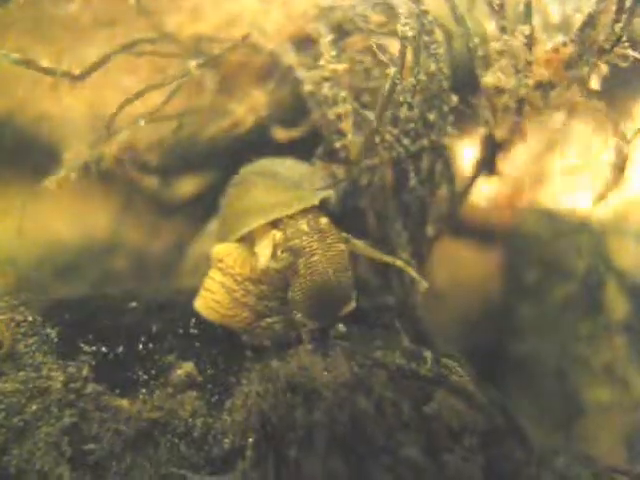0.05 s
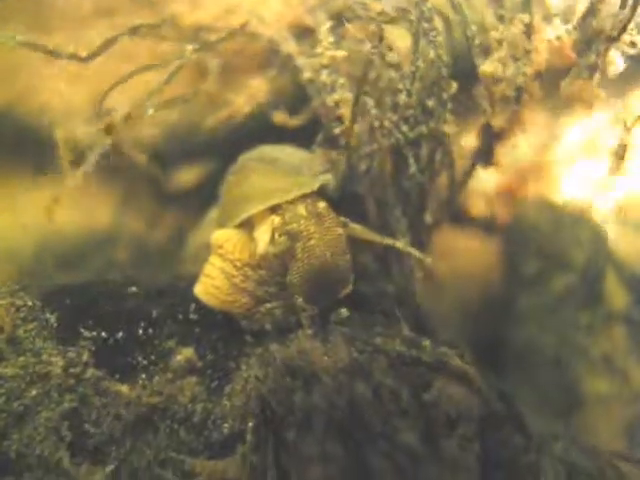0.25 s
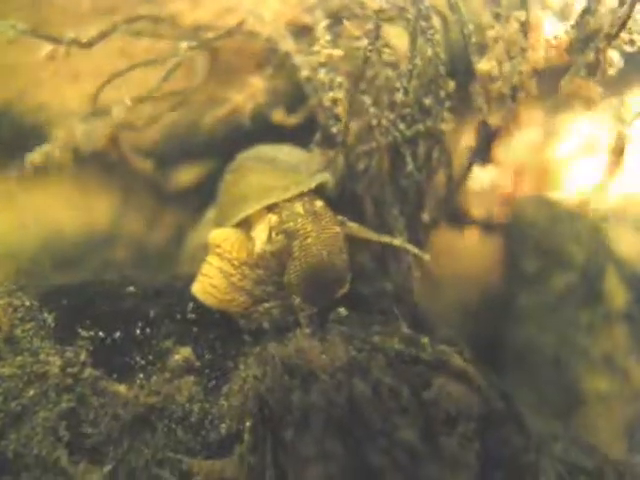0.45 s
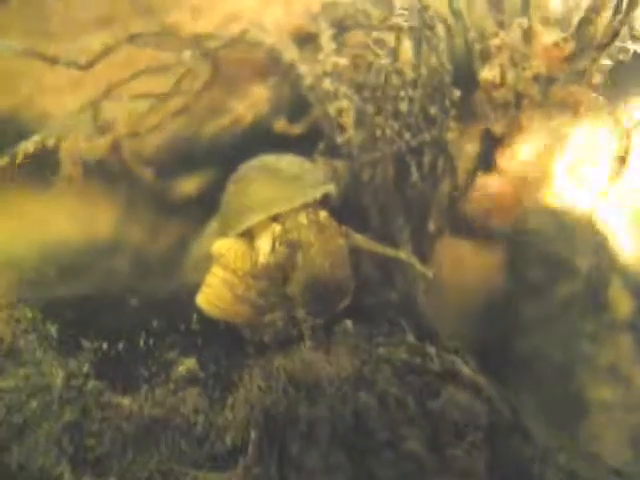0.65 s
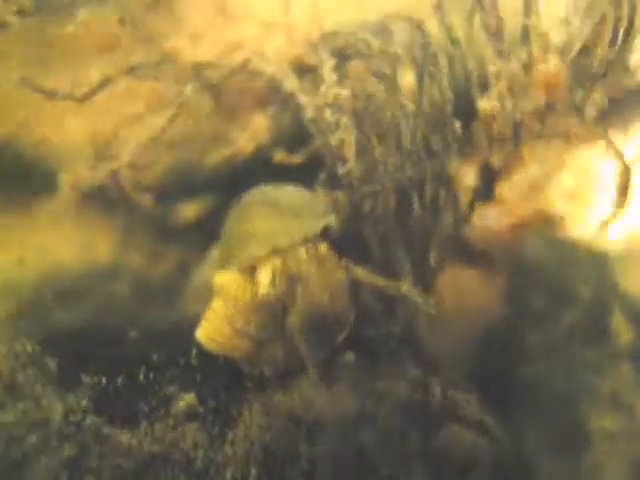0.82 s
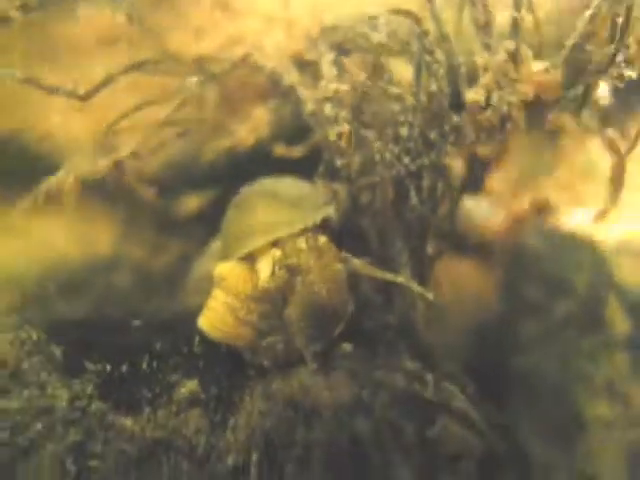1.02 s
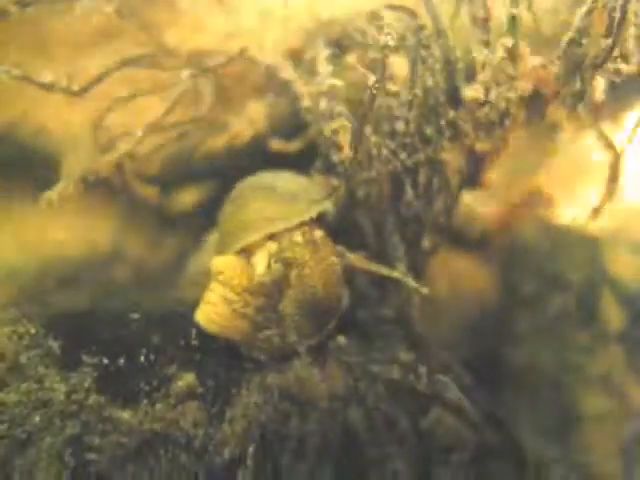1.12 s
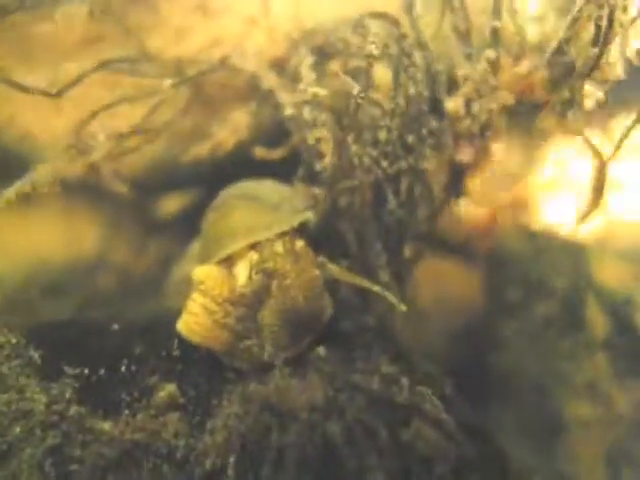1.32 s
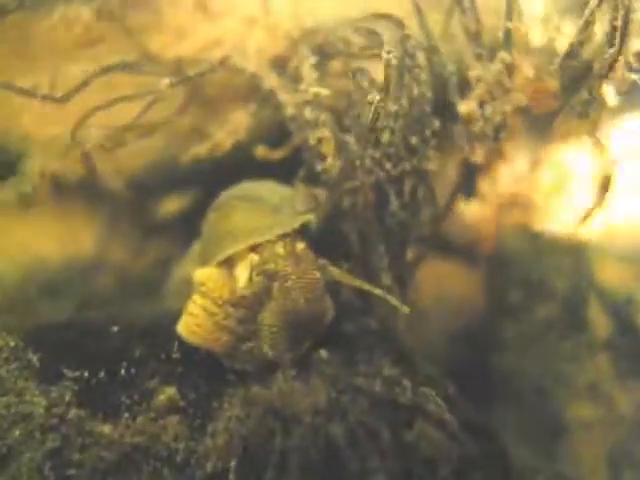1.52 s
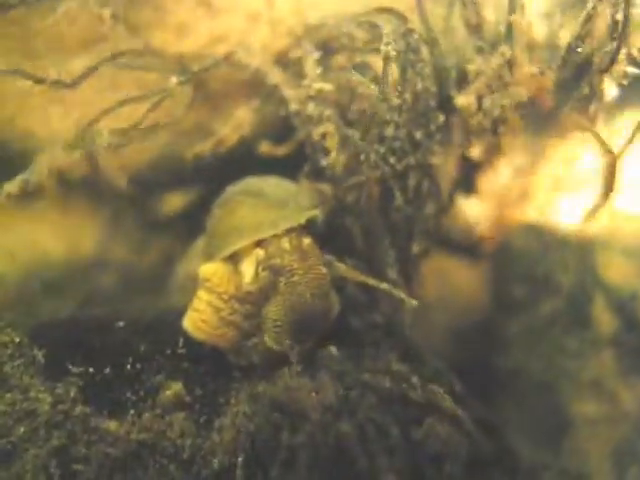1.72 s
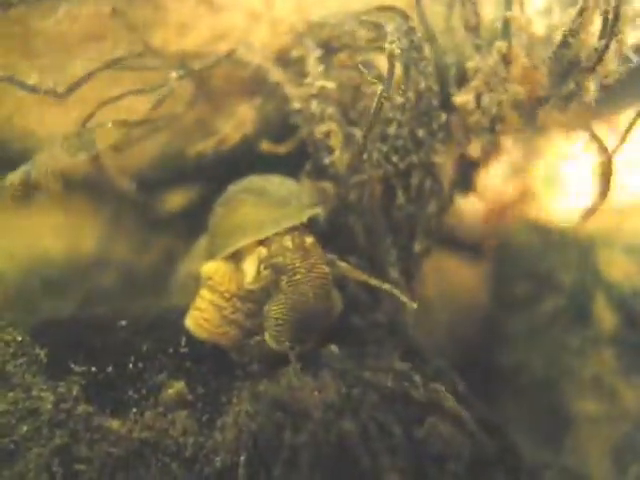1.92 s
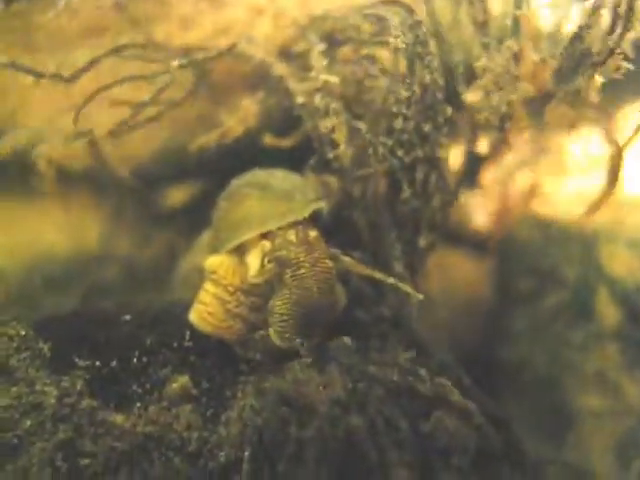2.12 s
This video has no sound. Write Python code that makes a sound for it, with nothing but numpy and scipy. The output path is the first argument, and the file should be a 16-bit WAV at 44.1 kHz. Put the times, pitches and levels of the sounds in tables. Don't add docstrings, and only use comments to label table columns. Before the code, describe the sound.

Hollow plastic housing knocks and clicks sharply in irregular bursts over a faint underwater stream rush

```python
import sys
import numpy as np
from scipy import signal
from scipy.fft import rfft, irfft, next_fast_len
from scipy.io import wavfile
from scipy.ndimage import uniform_filter1d, map_coordinates

SR = 44100
rng = np.random.default_rng(int(sys.argv[2]) if len(sys.argv) > 2 else 0)


def ratio_of_db(decibels):
    return 10 ** (np.asarray(decibels, float) / 20)


def dump_mix(stems):
    frames = np.atleast_2d(stems).T
    limited = np.clip(frames, -1, 1)
    pcm = np.round(limited * 32767).astype(np.int16)
    wavfile.write(sys.argv[1], SR, pcm)


N = 94815
CRACK_HZ, CRACK_WIDTH_HZ = 2800, 1450


def unit(x):
    return x / np.sqrt(np.mean(x ** 2) + 1e-20)


def wobble(rate, size):
    knots = rng.standard_normal(int(size * rate / SR) + 4)
    return map_coordinates(knots, [np.arange(size) * rate / SR])


def filtered(x, response):
    m = next_fast_len(len(x) + 8192)
    return irfft(rfft(x, m) * response(np.fft.rfftfreq(m, 1 / SR)), m)[:len(x)]


def resonant(x, hz, width):
    return unit(filtered(x, lambda f: 1j * f * width / (hz * hz - f * f + 1j * f * width)))


def add(out, s, x):
    out[round(s * SR):][:len(x)] += x


def grit():
    grains_per_s, spread_db = 400, 2
    draw = rng.random((2, N))
    struck = draw[0] < grains_per_s / SR
    size = ratio_of_db(-spread_db * np.log(draw[1] + 1e-9))
    return struck * size * rng.choice([-1, 1], N)


def water():
    # f/Hz, level/dB
    rush_spectrum = [(18, -87), (30, -9.5), (102, -4.5), (312, -3.5), (575, -3), (1330, -6.5), (1690, -6.5),
                     (3050, -11), (3900, -11), (5070, -52), (8580, -120)]
    # f/Hz, bandwidth/Hz, level/dB
    shell_modes = [
        (571.2, 37.7, 8.5),
        (870.4, 82, 3.5),
        (1767.4, 69, 6),
        (3000, 370, 3),
    ]
    # t/s, added level/dB
    stirring = [(0, 1), (.2, 0.5), (.48, 0), (.6, 2.5), (.72, 0.5), (.77, 2), (.9, 2), (1.1, 3.5), (1.3, 0),
                (1.6, 1), (2.15, 0)]
    water_db, patchy_db, grit_db, gurgle_db = -50, 1.3, -6.5, .6

    z = signal.stft(rng.standard_normal(N), nperseg=512)[2]
    patches = uniform_filter1d(rng.standard_normal(z.shape), 4, 0)
    patches = unit(uniform_filter1d(patches, 6, 1))
    rush = signal.istft(z * ratio_of_db(patchy_db * patches), nperseg=512)[1][:N]
    rush = unit(rush) + ratio_of_db(grit_db) * unit(grit())

    hz, db = np.transpose(rush_spectrum)

    def colour(f):
        peaks = sum(gain_db / (1 + ((f - centre) / width * 2) ** 2) for centre, width, gain_db in shell_modes)
        return ratio_of_db(np.interp(np.log(f + 1), np.log(hz + 1), db) + peaks)

    rush = unit(filtered(rush, colour))
    stir_db = np.interp(np.arange(N) / SR, *np.transpose(stirring))
    return ratio_of_db(water_db + stir_db + gurgle_db * wobble(30.15, N)) * rush


def lurches():
    # t/s, peak level/dB, push length/s
    lurch_table = [
        (.390, -30, 0.0021),
        (.426, -46.5, 0.0037),
        (.515, -36, 0.0035),
        (.637, -22, 0.00465),
        (.841, -32, 0.00216),
        (.997, -36, 0.0022),
        (1.136, -30.5, 0.0031),
    ]
    out, t = np.zeros(N + SR), np.arange(SR // 20) / SR
    for s, db, length in lurch_table:
        add(out, s, ratio_of_db(db) * np.e * t / length * np.exp(-t / length))
    return out[:N]


def creaks():
    # t/s, length/s, final level/dB, f/Hz
    creak_table = [(.376, .008, -49, 2300), (.924, .016, -41, 2060), (1.034, .012, -42, 2300),
                   (1.099, .034, -50, 2350), (.692, .026, -48, 2950), (.786, .026, -48, 2900),
                   (1.150, .030, -54, 2900), (1.558, .03, -55, 2200), (1.615, .02, -55, 3000),
                   (.335, .02, -55, 1750), (1.59, .04, -59, 2600)]
    swell_db, width_hz, slip_db, release_t60 = -1.5, 233, 4.5, 0.0185
    out, t = np.zeros(N + SR), np.arange(SR // 8) / SR
    for s, length, db, hz in creak_table:
        slips = rng.standard_normal(len(t)) * ratio_of_db(slip_db * wobble(370, len(t)))
        tone = resonant(slips, hz, width_hz)
        swell = swell_db * (np.minimum(t / length, 1) - 1)
        release = -60 * np.maximum(t - length, 0) / release_t60
        onset = np.minimum(t / 0.0035, 1)
        add(out, s, ratio_of_db(db + swell + release) * onset * tone)
    return out[:N]


def stiff_impacts(rows, rise, crack_db, rough, spike_db):
    spike_s = .00008
    out, t = np.zeros(N + SR), np.arange(SR // 12) / SR
    for s, db, hz, t60 in rows:
        shape = (1 - np.exp(-(t / rise) ** 2)) * ratio_of_db(-60 * t / t60)
        shape = shape / shape.max()
        ring = np.sin(2 * np.pi * (hz * t + rough * wobble(482, len(t))))
        crack = ratio_of_db(crack_db) * resonant(wobble(9053, len(t)), CRACK_HZ, CRACK_WIDTH_HZ)
        u = (t - rise) / spike_s
        spike = ratio_of_db(spike_db) * (u * u - 1) * np.exp(-u * u / 2)
        add(out, s - rise, ratio_of_db(db) * (shape * (ring + crack) + spike))
    return out[:N]


def seam_snaps():
    # t/s of the peak, peak level/dB, f/Hz, t60/s
    snap_table = [(.2060, -43, 2054, 0.024), (.2105, -40, 2197, 0.0214), (.2385, -47.5, 2023, 0.033),
                  (.3867, -17, 2100, 0.004), (.3899, -12, 2800, .007), (.3925, -19, 2373, 0.0086),
                  (.4246, -32.5, 2620, 0.0095), (.4262, -23.5, 2222, 0.0255), (.4283, -34.5, 2300, 0.0137),
                  (.4195, -41, 2220, 0.0226), (.5016, -33, 2260, 0.027), (.5072, -32, 2110, 0.025),
                  (.5125, -32.5, 2070, 0.0156), (.6333, -25, 2800, 0.0098), (.6365, -31.5, 2630, 0.0115),
                  (.6382, -19, 2290, 0.0088), (1.5900, -38.5, 2280, 0.0082), (.6404, -18.5, 3000, 0.0035),
                  (.6378, -22, 3800, 0.0066), (.6422, -30, 2714, 0.0063), (.6462, -29, 2090, 0.0196),
                  (.6438, -30, 2700, 0.0076), (.7166, -44.5, 2827, 0.049), (.7328, -37, 3000, 0.012),
                  (.8404, -23.5, 2663, 0.0097), (.8345, -41.5, 3000, 0.0138), (.8464, -34, 2658, 0.019),
                  (.8845, -35, 2184, 0.018), (.9330, -45, 2550, 0.014), (.9387, -25.5, 2725, 0.0131),
                  (.9405, -34, 2146, 0.0091), (.9445, -45, 2770, 0.0095), (.9759, -29, 3570, 0.0093),
                  (.9937, -26.5, 3244, 0.0083), (.9965, -32.5, 3200, 0.0074), (1.0220, -27, 2043, 0.0227),
                  (1.0278, -32, 2820, 0.0114), (1.0778, -38, 2210, 0.0214), (1.0878, -36.5, 2880, 0.0113),
                  (1.1327, -33, 2405, 0.0109), (1.1345, -36, 2294, 0.011), (1.1364, -23, 2420, 0.0079),
                  (1.1392, -34.5, 2160, 0.014), (1.1448, -37.5, 2350, 0.0154), (1.1764, -37.5, 2850, 0.027),
                  (1.2730, -41, 1856, 0.0145), (1.3075, -44.5, 1683, 0.02), (1.5225, -47, 3000, 0.0093),
                  (1.5275, -48, 3000, .01), (1.604, -39.5, 2900, 0.012), (1.609, -55.5, 2280, 0.0094),
                  (.397, -36, 1997, 0.042), (.4035, -39.5, 2210, 0.0295), (1.6325, -52, 2000, 0.0072),
                  (1.672, -42.5, 3000, 0.0076)]
    return stiff_impacts(snap_table, rise=.0004, crack_db=-5, rough=.1, spike_db=-5.5)


def button_ticks():
    # t/s of the peak, peak level/dB, f/Hz, t60/s
    tick_table = [(.3892, 1, 1971, 0.00473), (.6397, -11, 3000, 0.00544), (.6399, -17.5, 2165, 0.00855),
                  (1.0452, -27, 1950, 0.013), (1.0425, -29, 2015, .015), (.7338, -42.5, 2142, 0.055),
                  (.8398, -22.5, 1948, 0.0076), (.9180, -43, 2043, 0.026), (.9344, -33.5, 1990, 0.0296),
                  (.9780, -36.5, 2016, 0.023), (.9950, -23.5, 2014, 0.0182), (1.0278, -32, 2052, 0.0414),
                  (1.0492, -23, 2030, 0.02), (1.0527, -17.5, 2003, 0.0263), (1.0581, -21, 2030, 0.028),
                  (1.0685, -18, 1936, 0.0078), (1.0742, -29.5, 2077, 0.0126)]
    return stiff_impacts(tick_table, rise=0.0012712, crack_db=-21, rough=0.08, spike_db=-7)


def lid_taps():
    # t/s of the peak, peak level/dB, f/Hz, t60/s
    tap_table = [(.2066, -29.5, 1344, 0.0171), (.3902, -12.5, 1126, 0.0079), (.3908, -14.5, 1515, 0.01),
                 (.3948, -18.5, 1190, 0.0091), (.3995, -30.5, 1249, 0.032), (.4262, -21.5, 1305, 0.0205),
                 (.5021, -21, 1009, 0.0104), (.5071, -24, 1125, 0.0076), (.6348, -22.5, 972, 0.0057),
                 (.6395, -37, 981, 0.0585), (.8424, -24, 1068, 0.0096), (1.0680, -29, 1181, 0.031),
                 (1.0736, -31, 1215, 0.036), (1.1331, -22.5, 965, 0.0068), (1.1369, -24.5, 902, 0.0087),
                 (1.1405, -32.5, 1107, 0.0225)]
    return stiff_impacts(tap_table, rise=0.000687, crack_db=-16.5, rough=.08, spike_db=-34)


def catch():
    # delay t/s, level/dB
    chatter_table = [
        (0, 2),
        (.0033, -2),
        (.0062, -4),
        (0.012, -12),
    ]
    # f/Hz, level/dB, t60/s
    catch_modes = [
        (1358.3, -6, 0.1154),
        (1796, -18.5, 0.099),
        (2278, 0, 0.07),
        (2465, -8, 0.0904),
        (2950, -2, 0.02),
        (3132, -21, 0.134),
        (3426, -33, 0.043),
    ]
    catch_s, catch_db, flutter_db, rough_cycles = .5158, -20.5, 1.5, .07
    out, t = np.zeros(N + SR), np.arange(SR // 5) / SR
    for delay, hit_db in chatter_table:
        ring = np.zeros(len(t))
        for hz, db, t60 in catch_modes:
            unsteady = (hz / 2000) ** 2
            shape = ratio_of_db(db + flutter_db * unsteady * wobble(247, len(t)) - 60 * t / t60)
            cycles = hz * t + rough_cycles * unsteady * wobble(142.6, len(t))
            ring += shape * np.sin(2 * np.pi * cycles)
        crack = resonant(wobble(8652, len(t)), CRACK_HZ, CRACK_WIDTH_HZ)
        crack = 1.453 * ratio_of_db(-60 * t / 0.0244) * crack
        add(out, catch_s + delay, ratio_of_db(catch_db + hit_db) * (ring + crack))
    return out[:N]


def knocks():
    # t/s, peak level/dB, f/Hz, finger contact/s
    knock_table = [(0.2059, -16.5, 406, 0.00837), (0.21, -13.5, 408.3, 0.00352),
                   (0.223, -25.5, 376, 0.00414), (0.2346, -40.5, 392.5, 0.009), (0.2436, -25, 373, 0.00516),
                   (.2395, -40.5, 636, 0.00186), (0.387, -28.5, 364.3, 0.00365),
                   (0.4176, -37.5, 397, 0.00165), (0.4201, -22.5, 398, 0.0007),
                   (0.4216, -26.5, 390.6, 0.00133), (0.4249, -20, 359.4, 0.00479),
                   (0.4391, -38.5, 387, 0.0043), (0.5013, -16, 423.4, 0.00673),
                   (0.5162, -23, 324.4, 0.00126), (.6330, -22.5, 454, 0.00047),
                   (0.6381, -19.5, 414, 0.00367), (.83, -35, 495.3, 0.00198),
                   (0.8332, -30.5, 404.6, 0.00286), (0.841, -22, 458, 0.00161), (.9010, -39, 448, 0.003),
                   (0.9169, -38.5, 498, .0005), (.9235, -41, 461, .001), (0.9341, -37.5, 513, 0.00096),
                   (.9432, -47, 400, .003), (0.9758, -39.5, 560, 0.00091), (.9940, -27.5, 404, 0.00062),
                   (0.9975, -20.5, 365, 0.00341), (1.022, -32, 538, 0.00059), (1.051, -38, 440, 0.0018),
                   (1.057, -37.5, 414, 0.0026), (1.0280, -37.5, 423, 0.0026), (1.0646, -28.5, 396, 0.00726),
                   (1.0730, -32, 435, 0.00224), (1.1320, -31, 486, 0.00071), (1.1352, -27.5, 477.7, 0.0066),
                   (1.2550, -50, 570.6, 0.02), (.6760, -42.5, 585, 0.00294), (.7000, -47, 582, 0.0034),
                   (.3240, -42, 489, 0.002)]
    rise_s, t60, tail_db, tail_t60 = 0.0005, 0.01915, -21.5, 0.17
    sag, sag_s, wander = 0.1486, 0.0037, .015
    buzz_db, push_db = -16, -6
    out, t = np.zeros(N + SR), np.arange(SR // 8) / SR
    for s, db, hz, hold in knock_table:
        free = np.maximum(t - hold, 0)
        decay = ratio_of_db(-60 * free / t60) + ratio_of_db(tail_db - 60 * free / tail_t60)
        shape = (1 - np.exp(-t / rise_s)) * decay
        bend = sag * min(hold / 0.01004, 1) ** 2 * np.exp(-t / sag_s)
        pitch = hz * (1 + bend + wander * wobble(132.3, len(t)))
        swing = shape * np.sin(2 * np.pi * np.cumsum(pitch) / SR)
        buzz = ratio_of_db(buzz_db) * shape * unit(wobble(2012, len(t)))
        u = t * hz * 3.67
        push = ratio_of_db(push_db) * u * (2 - u) * np.exp(-u)
        add(out, s, ratio_of_db(db) * (swing + buzz + push))
    return out[:N]


def scene():
    plastic = lid_taps() + button_ticks() + seam_snaps()
    return (water() + lurches() + creaks() + plastic + catch() + knocks())[None]


def roll_off(x):
    return signal.sosfilt(signal.butter(12, 16230, fs=SR, output="sos"), x)


def record(dry):
    edge_hz, edge_width_hz, low_cut_hz = 3995, 691, 70
    sample_hz, top_hz, top_leak_db = 8000, 15750, -18.5

    def input_band(f):
        low = (f / low_cut_hz) ** 3
        high = 1 + np.exp(np.clip((f - edge_hz) / edge_width_hz, -40, 40))
        return low / (1 + low) / high

    x = filtered(dry[0], input_band)
    steps = np.floor(np.arange(N) * sample_hz / SR) * SR / sample_hz
    held = np.clip(map_coordinates(x, [steps], order=3), -.9, .9)
    held = filtered(held, lambda f: np.where(f < top_hz, 1, ratio_of_db(top_leak_db)))
    return roll_off(np.clip(held, -1, 1)[None])


dry = scene()
out = record(dry)
dump_mix(out)
```